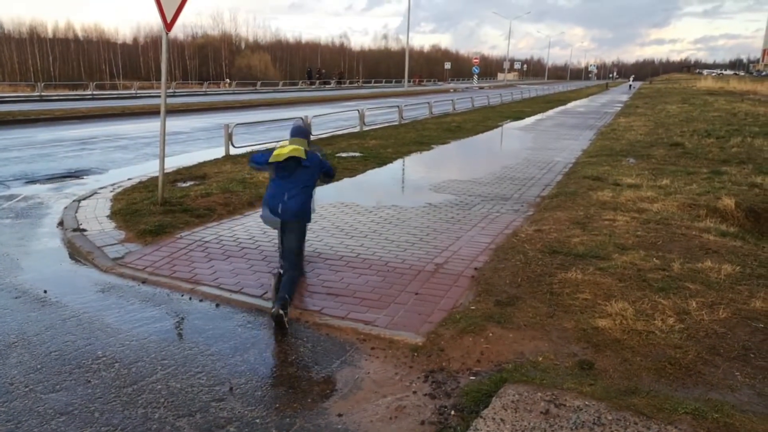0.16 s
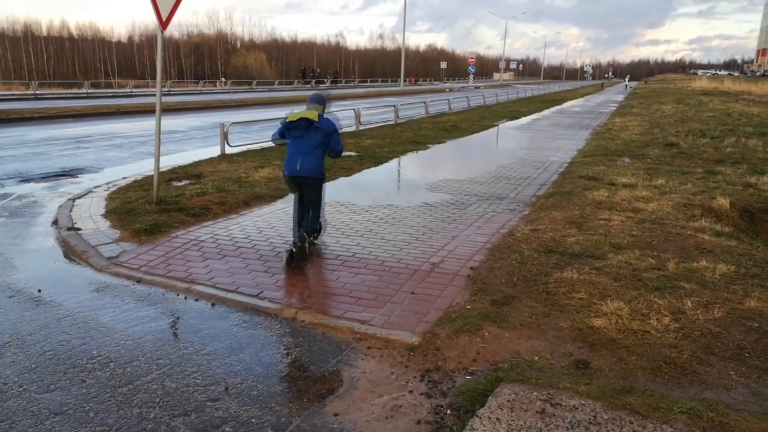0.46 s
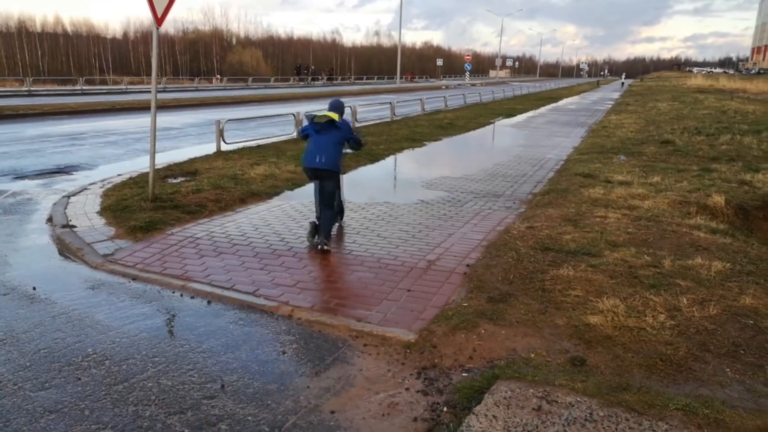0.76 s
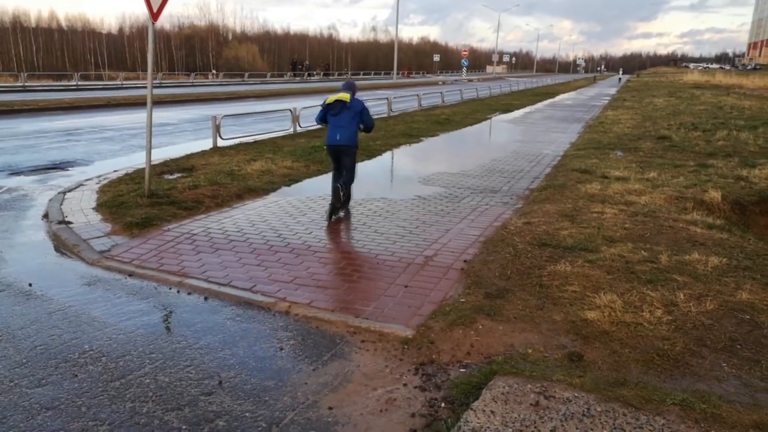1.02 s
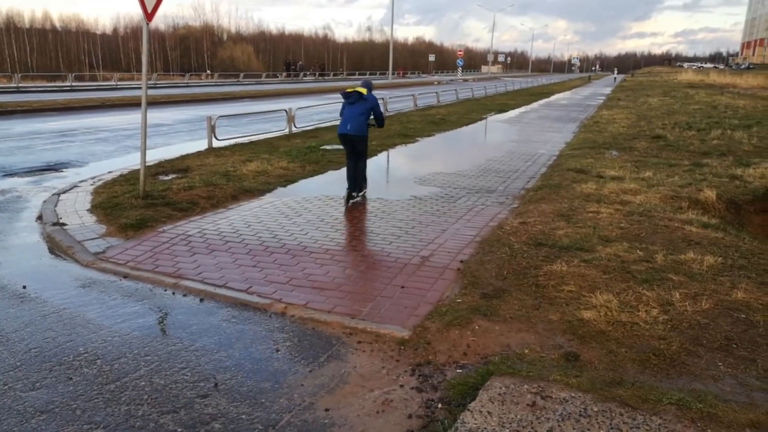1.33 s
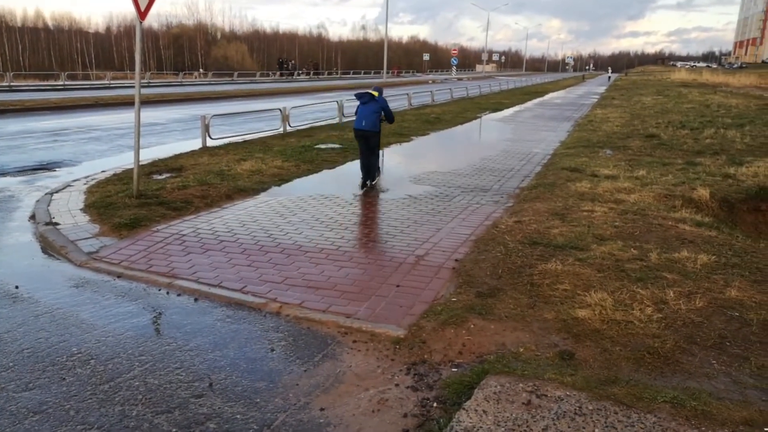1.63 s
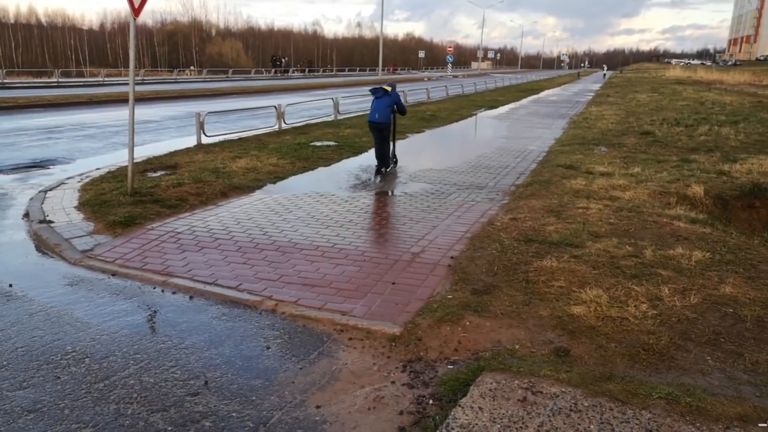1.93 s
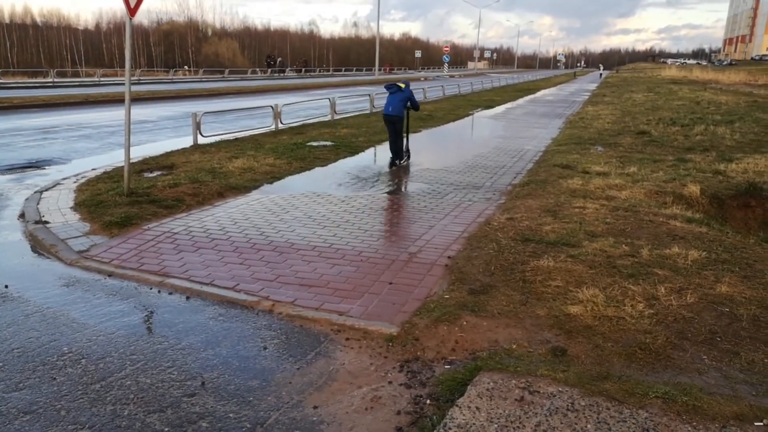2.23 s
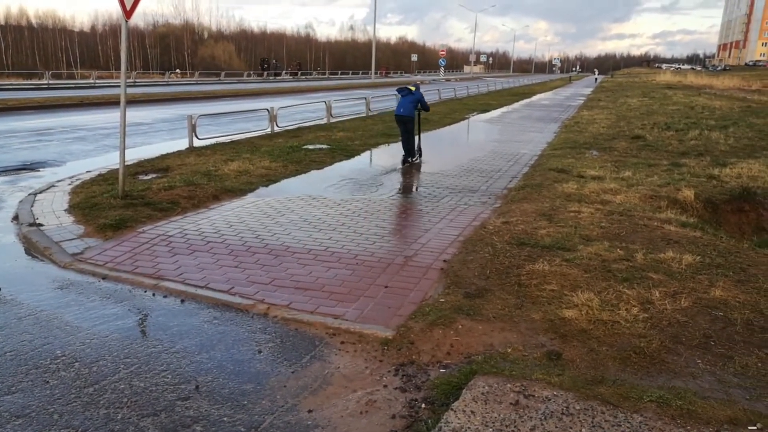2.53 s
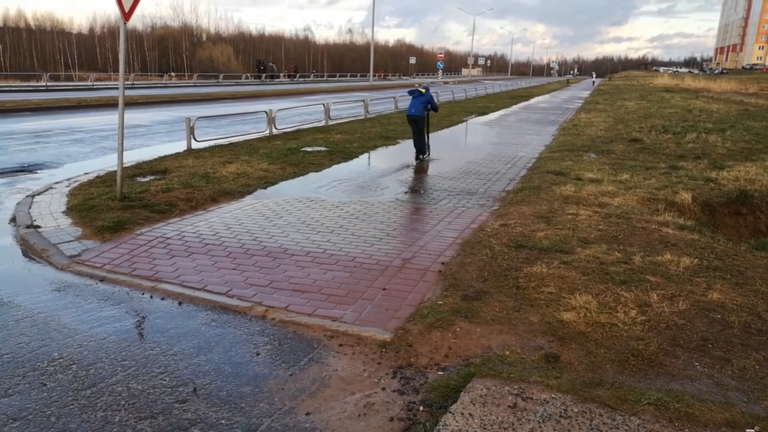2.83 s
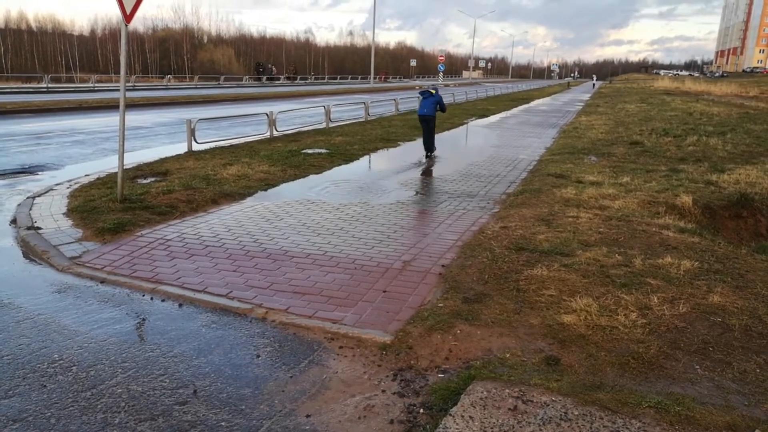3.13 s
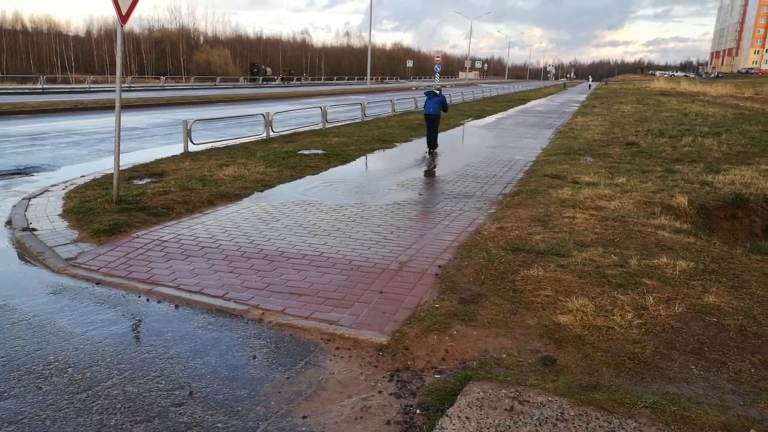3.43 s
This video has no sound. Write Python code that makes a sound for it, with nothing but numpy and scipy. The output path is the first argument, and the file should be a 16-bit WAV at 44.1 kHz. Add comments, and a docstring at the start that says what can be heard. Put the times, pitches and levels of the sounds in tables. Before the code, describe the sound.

A kick scooter rattles and clatters over wet paving blocks, rolling away.

```python
"""A kick scooter bumps over a kerb and rolls away along wet paving blocks beside a road.
Each joint knocks the frame and shakes its loose metal parts; the deck thumps, the steering column buzzes.
The wheels crunch grit, throw spray, drum on the blocks and squeak once.
Wind buffets the microphone over the hiss of distant traffic."""
import sys
import numpy as np
from scipy import signal
from scipy.fft import rfft, irfft
from scipy.io import wavfile
from scipy.ndimage import uniform_filter1d, map_coordinates

SR = 44100
rng = np.random.default_rng(int(sys.argv[2]) if len(sys.argv) > 2 else 0)


def master_out(mix):
    """Clip the mix to full scale and print it as 16-bit PCM to the path in sys.argv[1]."""
    frames = np.transpose(np.atleast_2d(mix))
    ceiling = np.clip(frames, -1, 1)
    pcm = np.round(ceiling * 32767).astype(np.int16)
    wavfile.write(sys.argv[1], SR, pcm)


N = 157437
TIME_S = np.arange(N) / SR
TOP_HZ = 15400


def undb(db):
    """Decibels to gain."""
    return 10 ** (np.asarray(db) / 20)


def unit(x):
    """Scale to rms 1."""
    return x / np.sqrt(np.mean(x ** 2))


def on_bins(points):
    """Interpolate a table over log frequency at every FFT bin."""
    hz, value = np.array(points, float).T
    return np.interp(np.log(np.arange(N + 1) * SR / (2 * N) + 1), np.log(hz), value)


def filtered(x, gain):
    """Apply a spectral gain."""
    return irfft(rfft(x, 2 * N) * gain)[..., :N]


def colour(x, spectrum):
    """Minimum-phase filter that keeps the power of white noise."""
    cepstrum = irfft(np.log(unit(undb(on_bins(spectrum)))))
    cepstrum[1:N] *= 2
    cepstrum[N + 1:] = 0
    return filtered(x, np.exp(rfft(cepstrum)))


def envelope(table, column=1):
    """Gain over time from a column of levels."""
    rows = np.array(table)
    return undb(np.interp(TIME_S, rows[:, 0], rows[:, column]))


def clicks(per_s, spread_db, size=N):
    """Two independent streams of uneven random contacts, rms 1."""
    shape = (2, size)
    strength = undb(spread_db * np.clip(rng.standard_normal(shape), -2, 2))
    polarity = rng.choice([-1, 1], shape)
    return unit(strength * polarity * (rng.random(shape) < per_s / SR))


def tail(t60_s):
    """Two independent bursts of decaying noise, each of energy 1."""
    t = np.arange(SR // 4) / SR
    burst = rng.standard_normal((2, len(t))) * np.exp(-np.log(1000) * t / t60_s)
    return burst / np.linalg.norm(burst, axis=1, keepdims=True)


def modal(modes):
    """Ring of a struck object: a sum of damped sines."""
    t = np.arange(SR // 4) / SR
    return sum(undb(db) * np.sin(2 * np.pi * hz * t) * np.exp(-np.log(1000) * t / t60_s)
               for hz, db, t60_s in modes)


def ring(x, response):
    """Convolve with an impulse response."""
    return signal.fftconvolve(np.atleast_2d(x), response, axes=1)[:, :N]


def add(track, start_s, sound):
    """Mix a sound into a track."""
    i = int(start_s * SR)
    track[..., i:i + sound.shape[-1]] += sound[..., :N - i]


# Left-right likeness: f/Hz, correlation before clipping
LIKENESS = [(170, 1.3), (290, 1.3), (600, -0.65), (900, 0.4), (1500, 0.86), (2200, 0.83), (4000, 0.57),
            (8000, 0.6), (14000, 0.6)]
def stereo(pair):
    """Mix two independent signals to left and right, alike in the bass."""
    correlation = np.clip(on_bins(LIKENESS), -.999, .999)
    mid, side = filtered(pair, np.sqrt(np.array([1 + correlation, 1 - correlation]) / 2))
    return np.array([mid + side, mid - side])


# Road noise spectrum: f/Hz, level/dB
TRAFFIC_SPECTRUM = [(100, -1), (170, 2.5), (300, -7.5), (620, -9), (1000, -16), (1750, -16), (2800, -12),
                    (4300, -35), (9500, -32), (15000, -52)]
def traffic(level_db=-58.5):
    """Even hiss of the far road."""
    return stereo(undb(level_db) * colour(rng.standard_normal((2, N)), TRAFFIC_SPECTRUM))


# Gust envelope: t/s, level/dB
GUSTS = [(0.0, -44.5), (0.07, -55.5), (0.13, -44), (0.9, -40), (0.94, -51), (1.28, -37), (1.39, -45.5),
         (1.97, -43), (2.05, -33), (2.14, -50), (2.37, -35), (2.43, -52), (2.66, -37.5), (2.71, -50),
         (2.75, -31), (3.4, -52.5), (3.49, -39.5), (3.57, -49)]
# Buffeting spectrum: f/Hz, level/dB
WIND_SPECTRUM = [(10, -4.5), (25, 0), (38, -4), (51, 2), (70, -7.5), (110, -12), (200, -31), (400, -53),
                 (1000, -73)]
def wind(gain_db=2.5):
    """Gusts rumble on the microphone."""
    rumble = colour(rng.standard_normal((2, N)), WIND_SPECTRUM)
    return stereo(rumble * envelope(GUSTS) * undb(gain_db))


# Bursts of water: peak t/s, level/dB, half width/s
SPRAYS = [(0.39, -53, 0.02), (0.516, -53, 0.027), (0.676, -49.5, 0.05), (0.877, -43.5, 0.067),
          (1.55, -53, 0.079), (2.345, -60, 0.023), (2.65, -50.5, 0.009)]
# Spectra of fine spray and puddle spatter: f/Hz, level/dB
SPRAY_SPECTRUM = [(1000, -22), (2200, 2), (3500, 4), (5500, -1), (8000, 2), (10500, -10), (15000, -23)]
SPATTER_SPECTRUM = [(2000, -20), (4500, -3), (7500, 2), (10000, -11.5), (15000, -20)]
def spray(puddle_db=-62, puddle_at_s=2.74, puddle_half_s=0.5):
    """Fine drops fizz off the wheels; sparser ones crackle through a puddle."""
    flow = sum(undb(db) * np.exp(-((TIME_S - peak_s) / half_s) ** 2) for peak_s, db, half_s in SPRAYS)
    puddle = undb(puddle_db) * np.exp(-((TIME_S - puddle_at_s) / puddle_half_s) ** 2)
    fizz = colour(clicks(per_s=630, spread_db=3) * flow, SPRAY_SPECTRUM)
    spatter = colour(clicks(per_s=160, spread_db=3) * puddle, SPATTER_SPECTRUM)
    return stereo(fizz + spatter)


# Snapping grains: t/s, level/dB, centre f/Hz
SNAPS = [(1.408, -18.5, 3500), (2.158, -32, 1980), (2.260, -29.5, 870), (2.295, -27, 6240),
         (2.750, -29, 1870), (2.771, -45, 2000), (2.820, -37, 2100), (2.848, -40, 2500), (3.122, -41, 2000)]
def snaps(decay_s=0.0023, width_octaves=1.24):
    """Single grains crack under a wheel, each in its own broad band."""
    t = np.arange(SR // 50) / SR
    out = np.zeros((2, N))
    for start_s, db, hz in SNAPS:
        edges_hz = np.minimum(hz * 2 ** (np.array([-.5, .5]) * width_octaves), TOP_HZ)
        band = signal.butter(2, edges_hz, "bandpass", fs=SR, output="sos")
        crack = unit(signal.sosfilt(band, rng.standard_normal((2, len(t)))))
        add(out, start_s, undb(db) / 2 * crack * np.exp(-t / decay_s))
    return stereo(out)


def squeak(start_s=2.041, level_db=-41, from_hz=2800, to_hz=2760, glide_s=0.015, rise_s=0.013):
    """Wet rubber slips for a moment with an unsteady pitch."""
    t = np.arange(SR // 5) / SR
    jitter = 0.094 * unit(uniform_filter1d(rng.standard_normal(len(t)), size=60))
    hz = (to_hz + (from_hz - to_hz) * np.exp(-t / glide_s)) * (1 + jitter)
    swell = undb(level_db) * t / rise_s * np.exp(1 - t / rise_s)
    out = np.zeros(N)
    add(out, start_s, swell * np.sin(2 * np.pi * np.cumsum(hz) / SR))
    return out


# Blows on the deck: t/s, level/dB, f/Hz
THUMPS = [(0.227, -34, 175), (0.564, -40.5, 276), (0.84, -33, 164), (0.903, -35.5, 160), (1.251, -33, 130),
          (1.549, -36, 147), (1.689, -35, 165), (1.884, -38, 137)]
# Loaded deck modes: frequency ratio, level/dB, t60/s
DECK_MODES = [(1, 5, 0.08), (1.35, -13, 0.064), (1.85, -15.5, 0.12)]
# Hollow knock modes: f/Hz, level/dB, t60/s
HOLLOW_MODES = [(550, -5, 0.062), (755, 4, 0.043), (850, 7.5, 0.051), (910, 2, 0.034)]
def thumps(deck_gain_db=-1.5, hollow_at_s=1.43, hollow_gain_db=-41.5):
    """Dull blows on the deck, pitched by where the rider's weight lands, and one hollow knock."""
    out = np.zeros(N)
    for start_s, db, hz in THUMPS:
        modes = [(hz * ratio, mode_db, t60_s) for ratio, mode_db, t60_s in DECK_MODES]
        add(out, start_s, undb(db + deck_gain_db) * modal(modes))
    add(out, hollow_at_s, undb(hollow_gain_db) * modal(HOLLOW_MODES))
    return out


# Steering column modes: f/Hz, level/dB, t60/s
COLUMN_MODES = [(1181, 5.5, 0.019), (1830, -9, 0.034), (1770, -1.5, 0.025), (2557, -2.5, 0.057)]
# Buzz envelope: t/s, level/dB
BUZZ = [(0, -62.5), (.55, -78), (.7, -64), (.98, -59.5), (1.3, -47), (2.05, -56), (2.16, -65),
        (2.35, -50.5), (2.45, -58.5), (2.8, -50), (3.0, -62.5), (3.22, -55), (3.33, -68.5), (3.46, -59.5),
        (3.53, -49.5), (3.57, -61)]
def column_buzz():
    """Play in the steering column keeps its modes buzzing."""
    contacts = clicks(per_s=190, spread_db=7)
    buzz = unit(ring(contacts, modal(COLUMN_MODES)[None]))
    return stereo(buzz) * envelope(BUZZ)


# Frame and column modes: f/Hz, level/dB, t60/s, L-R/dB
FRAME_MODES = [(1142, -16, 0.078, -6), (1680, -3, 0.033, -23), (1801, 2.5, 0.057, -11),
               (1937, 2, 0.02, -30.5), (2080, -33, 0.053, 0), (2450, -1, 0.023, -33), (2688, 2, 0.053, 13),
               (3430, -8.5, 0.12, 31.5), (3970, -22, 0.16, 9), (4480, -24, 0.046, 15), (5450, 8, 0.022, 14),
               (5840, 10, 0.025, -3), (7330, 0, 0.019, -26)]
def frame(force, tubes_db=-9, deck_db=-1):
    """Contacts ring the tubes' modes and, briefly and densely, the deck."""
    tubes = np.array([modal([(hz, db + side * pan_db / 2, t60_s)
                             for hz, db, t60_s, pan_db in FRAME_MODES]) for side in (1, -1)])
    response = undb(tubes_db) * unit(tubes) / np.sqrt(tubes.shape[1]) + undb(deck_db) * tail(t60_s=0.04)
    response[:, 0] += 1  # bare contact
    return ring(stereo(force), response) / 2


# Rolling envelopes: t/s, grit level/dB, drum level/dB
ROLL = [(0.0, -55, -50), (0.12, -56, -51.5), (0.22, -42.5, -44), (0.35, -60.5, -53), (0.51, -63, -58),
        (0.56, -46, -51), (0.75, -44, -54), (0.86, -49, -40.5), (0.96, -55, -52), (1.13, -51, -48.5),
        (1.25, -43.5, -43), (1.42, -42.5, -41.5), (1.68, -41, -42.5), (1.87, -42.5, -47.5),
        (2.07, -49, -50.5), (2.5, -52, -59), (2.76, -48, -58), (2.96, -53, -55.5), (3.35, -54, -62),
        (3.57, -48, -52)]
# Spectra of grit, small bumps and drumming: f/Hz, level/dB
GRIT_SPECTRUM = [(300, -20), (700, -12.5), (1050, -5), (1800, -1), (2650, -5.5), (3100, -2), (4300, -6),
                 (5500, -4), (8000, -5), (11000, -14), (15000, -31)]
TICK_SPECTRUM = [(400, -23.5), (700, -9), (1050, -5), (1800, 4), (2600, 7), (3300, -17.5), (5500, -11),
                 (9000, -24), (15000, -46)]
DRUM_SPECTRUM = [(60, -18.5), (110, 4), (150, 2), (200, -2), (290, -6.5), (420, -21.5), (700, -27),
                 (1500, -39)]
def wheels(grit_gain_db=-2.5, tick_gain_db=-5):
    """Wet grit crackles under the wheels, small bumps tick, the blocks drum below."""
    grit = undb(grit_gain_db) * colour(clicks(per_s=4500, spread_db=7), GRIT_SPECTRUM)
    ticks = undb(tick_gain_db) * colour(clicks(per_s=150, spread_db=7.5), TICK_SPECTRUM)
    drum = colour(clicks(per_s=120, spread_db=2) * envelope(ROLL, column=2), DRUM_SPECTRUM)
    return frame((grit + ticks) * envelope(ROLL, column=1)) + stereo(drum)


def tinted(contact, spread_db=3.5, bands=36):
    """Random colour: no two jolts strike alike."""
    size = contact.shape[-1]
    band_db = spread_db * rng.standard_normal(bands)
    db = np.interp(np.fft.rfftfreq(size, 1 / SR), np.geomspace(600, 14000, bands), band_db)
    return irfft(rfft(contact) * unit(undb(db)), size)


KNOCK_GAIN_DB, KNOCK_DECAY_S, BOUNCE_GAIN_DB = -11, 0.0087, 6.5
RATTLE_GAIN_DB, RATTLE_ATTACK_S, RATTLE_DECAY_S = 4, 0.0018, 0.0084
CLACK_HZ, CLACK_SPREAD_OCTAVES, CLACK_GAIN_DB, CLACK_T60_S = 1077, 0.21, -25, 0.04
# Kerb and joint impacts: t/s, knock level/dB, rattle level/dB, rattle hold/ms
JOLTS = [(0.134, -27, -48, 19), (0.165, -37, -41, 14), (0.188, -38, -46, 11), (0.225, -27.5, -33.5, 12),
         (0.236, -19, -38.5, 7), (0.278, -30, -46.5, 29), (0.45, -42.5, -47.5, 3.4), (0.5, -30, -49.5, 18),
         (0.57, -41, -30, 7), (0.604, -19.5, -33, 7), (0.613, -28.5, -35, 7), (0.654, -35, -33, 10.3),
         (0.684, -44, -35.5, 4.4), (0.712, -43, -35, 6), (0.739, -39, -34, 12), (0.766, -36, -38.5, 7),
         (0.798, -35, -39, 10), (0.854, -62, -39, 12), (0.88, -37, -39.5, 9.9), (0.91, -35, -35, 7.1),
         (1.000, -28.5, -46.5, 10), (1.06, -36, -41.5, 10.6), (1.109, -30.5, -37.5, 9.3),
         (1.154, -34.5, -39, 17), (1.196, -26.5, -35.5, 6.2), (1.204, -26.5, -36, 5.7),
         (1.233, -18.5, -29, 6.8), (1.27, -24, -34.5, 5.5), (1.303, -17.5, -28.5, 8.3),
         (1.337, -25.5, -32.5, 7), (1.368, -28.5, -38.5, 9.2), (1.407, -21.5, -33, 2.7),
         (1.433, -28, -36.5, 8.8), (1.45, -26, -45, 16), (1.551, -23.5, -33, 3.6),
         (1.585, -22.5, -39.5, 15), (1.62, -21.5, -40.5, 12), (1.643, -18.5, -30, 4.3),
         (1.694, -25, -32, 9.3), (1.705, -18, -38.5, 8.1), (1.758, -34, -36, 3.8), (1.792, -26, -34.5, 4.1),
         (1.837, -30.5, -46.5, 8), (1.88, -24, -35.5, 5.6), (1.912, -57, -39.5, 7.6), (1.955, -32, -40, 11),
         (1.984, -29, -40.5, 20), (2.041, -30, -43.5, 15.5), (2.226, -38, -42, 5.6),
         (2.246, -35.5, -49, 28), (2.295, -35, -51.5, 33), (2.311, -34, -46, 13), (2.345, -37, -48, 12),
         (2.382, -36.5, -57, 6.5), (2.423, -58, -58, 6.1), (2.56, -43, -46.5, 8.4), (2.696, -32, -57, 6.2),
         (2.779, -40, -45.5, 3.9), (2.816, -57, -47, 3.5), (2.873, -36.5, -49.5, 22),
         (3.15, -33.5, -48, 4.9), (3.193, -30.5, -52, 6.5), (3.473, -61, -52.5, 10),
         (3.513, -33.5, -78, 14)]
# Spectra of knock and rattle: f/Hz, level/dB
KNOCK_SPECTRUM = [(200, -19.5), (450, -17.5), (700, -8), (950, -2.5), (1300, -1.5), (1700, 0.5), (2600, 3),
                  (3200, -15), (4200, -12.5), (5500, -12.5), (9000, -17.5), (15000, -48)]
RATTLE_SPECTRUM = [(400, -18.5), (700, -13), (1000, -9.5), (1800, -2), (3000, 2.5), (4200, -2.5),
                   (5500, 3.5), (6500, -3), (8200, -1.5), (10500, -8.5), (13000, -18), (15500, -18)]
def jolts():
    """Each joint gives a knock with quick bounces and a wheel clack; loose parts chatter and settle."""
    lead = 64  # samples before the impact
    age_s = np.maximum(np.arange(SR // 10) - lead, 0) / SR
    knock, rattle = np.zeros((2, 2, N))
    clack = np.zeros(N)
    for start_s, knock_db, rattle_db, hold_ms in JOLTS:
        bounces = clicks(per_s=4400, spread_db=3, size=len(age_s))
        chatter = clicks(per_s=4400, spread_db=3, size=len(age_s))
        bounces = unit(bounces * (age_s > 0) * np.exp(-age_s / KNOCK_DECAY_S))
        blow = undb(BOUNCE_GAIN_DB) * bounces / np.sqrt(len(age_s))
        blow[[0, 1], lead + rng.integers(0, 20, 2)] += rng.choice([-1, 1], 2)  # first contact
        add(knock, start_s - lead / SR, undb(knock_db) * np.sqrt(KNOCK_DECAY_S * SR / 2) * tinted(blow))
        attack = np.minimum(age_s / RATTLE_ATTACK_S, 1)
        settle = np.exp(-np.maximum(age_s - hold_ms * 1e-3, 0) / RATTLE_DECAY_S)
        add(rattle, start_s - lead / SR, undb(rattle_db) * tinted(attack * settle * chatter))
        clack_hz = CLACK_HZ * 2 ** (CLACK_SPREAD_OCTAVES * rng.standard_normal())
        add(clack, start_s, modal([(clack_hz, knock_db + CLACK_GAIN_DB, CLACK_T60_S)]))
    knock = undb(KNOCK_GAIN_DB) * colour(knock, KNOCK_SPECTRUM)
    rattle = undb(RATTLE_GAIN_DB) * colour(rattle, RATTLE_SPECTRUM)
    return frame(knock + rattle) + clack


def receding(x, from_s=2.98, above_hz=3420, loss_db_per_s=8.5):
    """Treble fades as the scooter rolls away."""
    lows = signal.sosfiltfilt(signal.butter(2, above_hz, fs=SR, output="sos"), x)
    return lows + (x - lows) * undb(-loss_db_per_s * np.maximum(TIME_S - from_s, 0))


def from_left(pair, start_lag_s=79.2e-6, centred_at_s=2.2):
    """The right channel lags until the source has drifted from the left to the centre."""
    lag_s = start_lag_s * np.maximum(1 - TIME_S / centred_at_s, 0)
    right = map_coordinates(pair[1], [np.arange(N) - lag_s * SR], order=3, mode="mirror")
    return np.array([pair[0], right])


def scene(scatter_db=-12.5):
    """The scooter, its faint scatter from the surroundings, wind and traffic."""
    rolling = receding(wheels())
    scooter = from_left(jolts() + rolling + column_buzz() + thumps() + squeak() + snaps() + spray())
    scatter = undb(scatter_db) * ring(scooter, tail(t60_s=0.1))
    return scooter + scatter + wind() + traffic()


# Microphone balance: f/Hz, L-R/dB
BALANCE = [(200, 0), (380, -2), (650, 3.5), (1200, -0.5), (2200, 4.5), (4400, -0.1), (8000, -0.5),
           (13000, -6)]
def record(dry):
    """Two microphones of unequal colour, then a steep low-pass."""
    heard = filtered(dry, undb(on_bins(BALANCE) * np.array([[1], [-1]]) / 2))
    return signal.sosfilt(signal.ellip(8, .2, 70, TOP_HZ, fs=SR, output="sos"), heard)


dry = scene()
out = record(dry)
master_out(out)
```